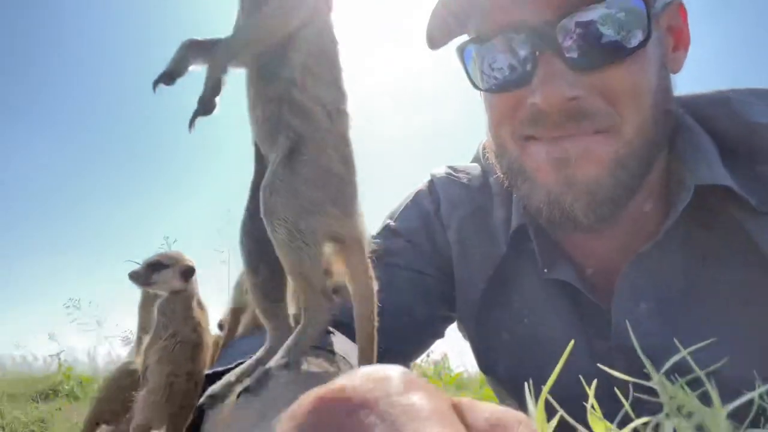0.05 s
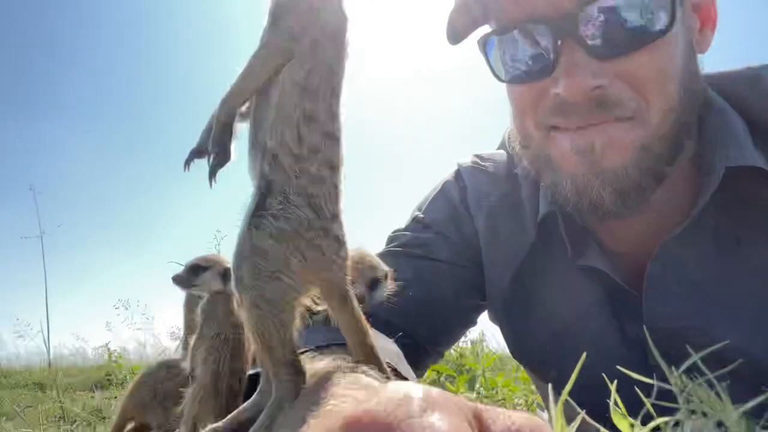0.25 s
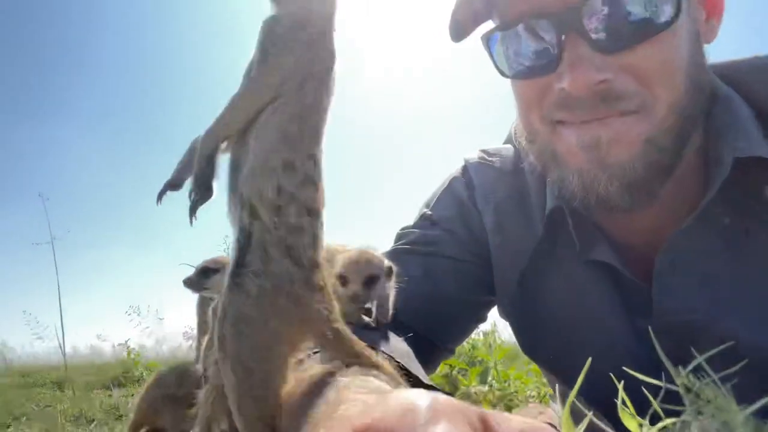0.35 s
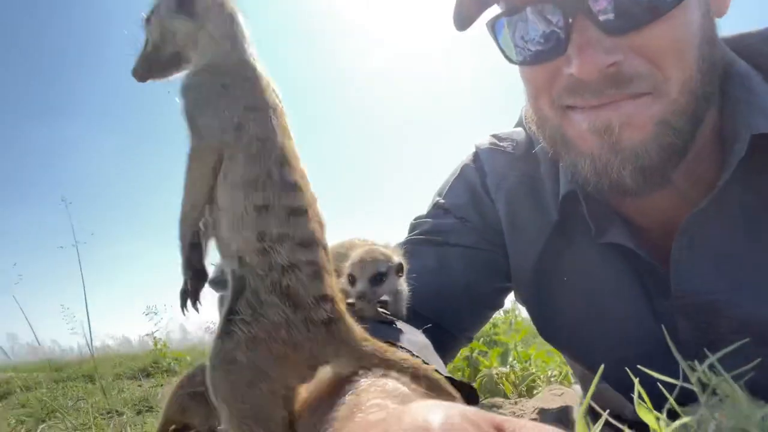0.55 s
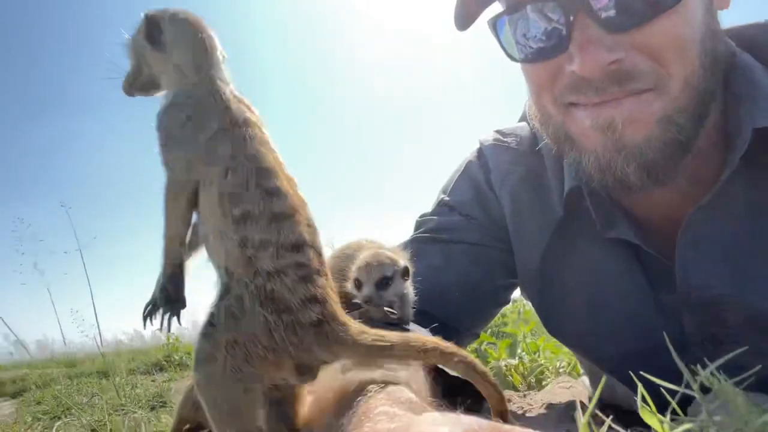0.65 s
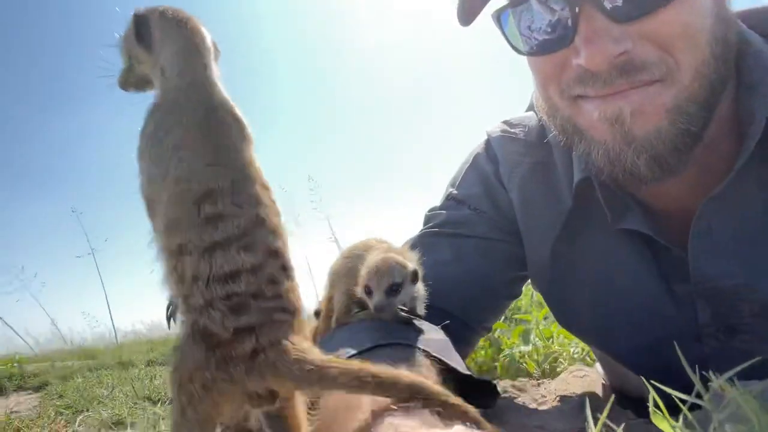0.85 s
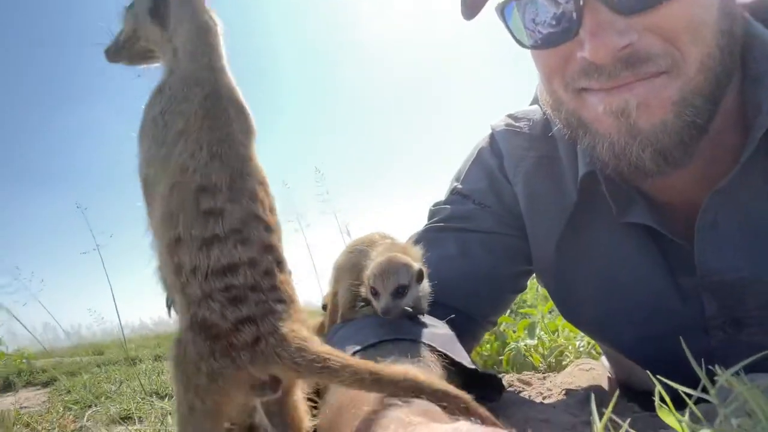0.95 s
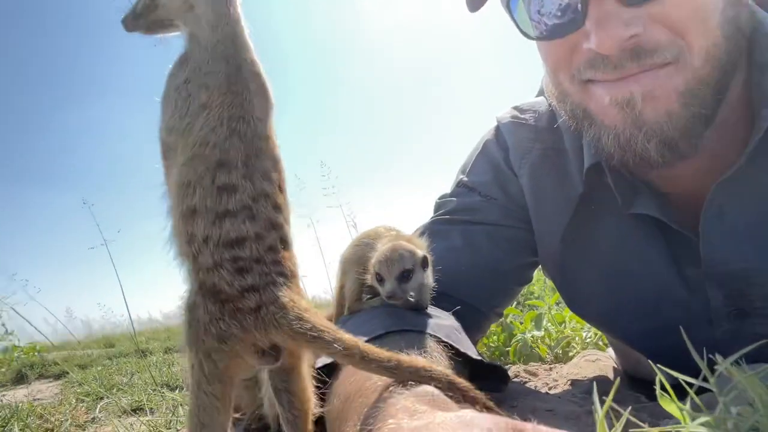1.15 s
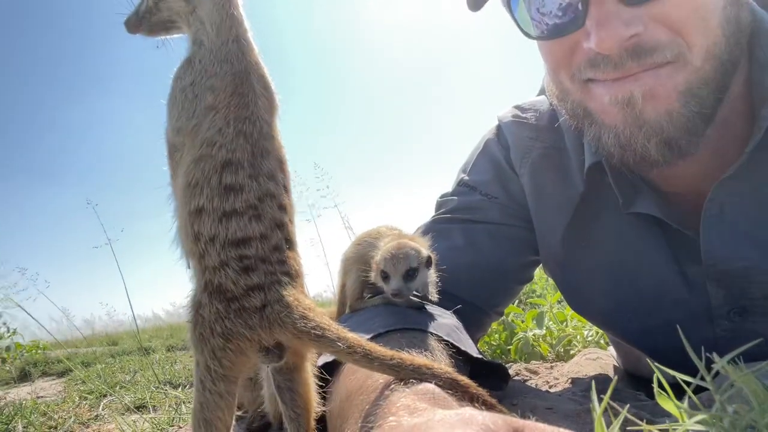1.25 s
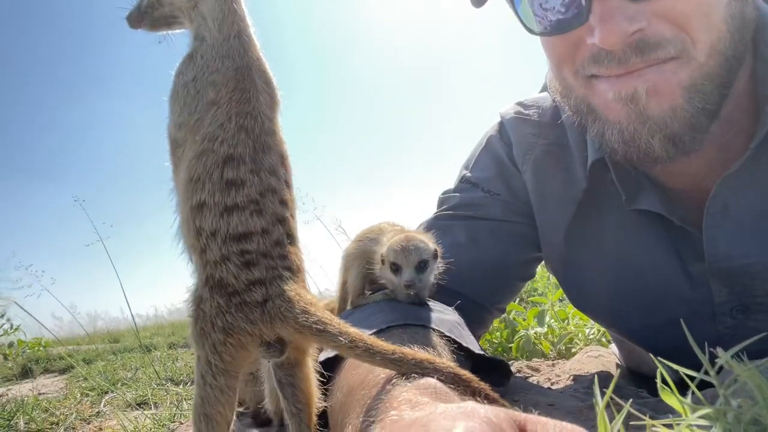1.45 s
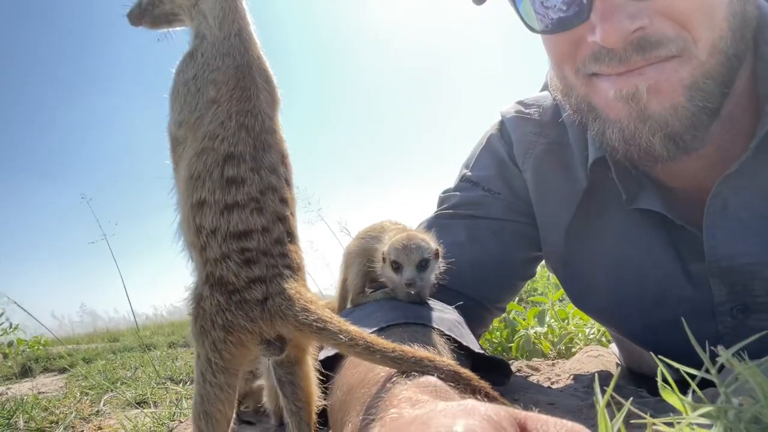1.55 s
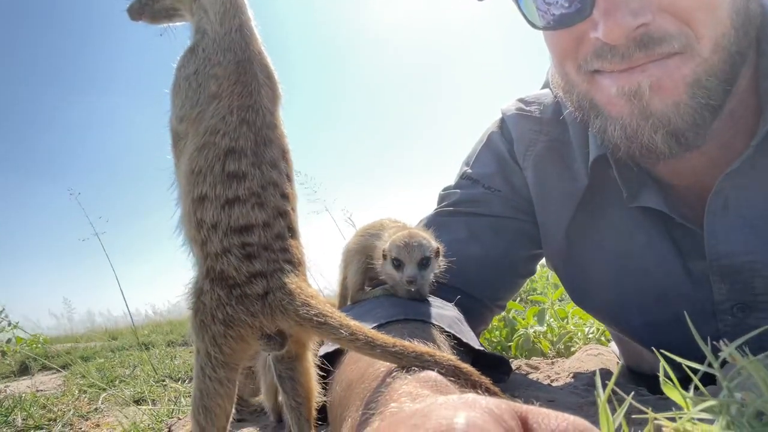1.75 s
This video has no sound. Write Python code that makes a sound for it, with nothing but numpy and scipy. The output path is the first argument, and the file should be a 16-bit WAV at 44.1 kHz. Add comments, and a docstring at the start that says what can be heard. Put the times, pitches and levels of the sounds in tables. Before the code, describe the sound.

A meerkat gives two harsh, raspy growls up close outdoors, with soft bumps between them.

```python
"""Meerkat growls and peeps in open grassland

Meerkats close to a hand-held phone. One gives two long raspy growls: jittered vocal pulses and breath,
throbbing, ring a small throat. Others peep briefly in gliding tones; nearby bodies and ground echo the voices.
Feet and hand bump the case (decaying low sines) and claws tick (short noise bursts). Fur and cloth rustle
and light wind rumbles, both as noise whose octave bands flicker separately.
"""
import sys
import numpy as np
from scipy import signal
from scipy.fft import rfft, irfft
from scipy.io import wavfile
from scipy.ndimage import uniform_filter1d

SR = 44100
rng = np.random.default_rng(int(sys.argv[2]) if len(sys.argv) > 2 else 0)


def persist_wave(psi):
    """Save psi, clipped to +-1, as 16-bit WAV."""
    counts = np.round(np.clip(psi, -1, 1) * 32767).astype(np.int16)
    wavfile.write(sys.argv[1], SR, np.atleast_2d(counts).T)


N = 79380
T = np.arange(N) / SR
F = np.fft.rfftfreq(N, 1 / SR)


def amp(db):
    """dB to gain."""
    return 10 ** (np.asarray(db) / 20)


def rms_one(x):
    """Scale to rms 1."""
    return x / np.sqrt(np.mean(x ** 2) + 1e-20)


def in_time(rows):
    """Interpolate table columns over time; the first column is seconds."""
    s, *columns = np.transpose(rows)
    return [np.interp(T, s, c) for c in columns]


def colour(x, points):
    """Shape the spectrum by (Hz, dB) points on a log frequency axis, then scale to rms 1."""
    hz, db = np.transpose(points)
    gain = amp(np.interp(np.log(F + 1), np.log(hz), db))
    return rms_one(irfft(rfft(x) * gain, N))


def drift(corner_hz):
    """Random wander of rms 1: white noise through two equal low-pass poles."""
    r = np.exp(-2 * np.pi * corner_hz / SR)
    white = rng.standard_normal(N + SR)
    return rms_one(signal.lfilter([1], [1, -2 * r, r * r], white)[SR:])


def resonance(x, hz, width_hz):
    """Two-pole peak of gain 1."""
    r = np.exp(-np.pi * width_hz / SR)
    poles = [1, -2 * r * np.cos(2 * np.pi * hz / SR), r * r]
    return signal.lfilter([(1 - r * r) / 2, 0, (r * r - 1) / 2], poles, x)


def patchy(points, flicker_db):
    """Coloured noise of rms 1 whose octave bands each flicker on their own."""
    white = rfft(rng.standard_normal(N))
    octave = np.round(np.log2(F + 1))
    bands = sum(irfft(white * (octave == k), N) * amp(flicker_db * drift(18.7)) for k in range(4, 15))
    return colour(bands, points)


# Phase lead of the left microphone common to all two_ports sources. Each row: frequency in Hz, lead in rad.
TREBLE_LEAD = [(7600, 0), (8600, 0), (10300, -3.14), (12100, -6.3), (13800, -9.4), (16000, -11)]


def two_ports(x, lead, balance_db=0):
    """One sound at two microphones: phase lead and level difference by frequency, split evenly."""
    phase_rad = np.interp(F, *np.transpose(lead + TREBLE_LEAD))
    half = np.exp(.5j * phase_rad) * amp(balance_db / 2)
    return irfft(rfft(x) * np.array([half, 1 / half]), N)


THROB_WANDER_CYCLES, THROB_LEAN_RAD = .03, -.8   # lean: swells slowly, drops fast
DEEP_GAPS_S = .126   # extra depth of second gaps fades out this long after gap_s
PULSE_SPREAD_DB, WEAK_PULSE_DB = 1.5, 3   # weak: typical drop of every second pulse at the top rate
WIDENING = 1.104   # on throat widths, since each resonance runs twice


def growl(rows, rates, throb, throat):
    """Jittered vocal pulses, each with a puff of breath over a steady leak, throb through the throat."""
    db, pulse_hz = in_time(rows)
    throb_hz, depth_db = in_time(rates)
    gap_s, second_db, jitter, breath, late_s = throb

    cycle = np.cumsum(pulse_hz * np.clip(1 + jitter * drift(250), .3, 3)) / SR
    count = np.floor(cycle - cycle[int(late_s * SR)])
    weak_db = WEAK_PULSE_DB * (count % 2) * pulse_hz / pulse_hz.max() * np.clip(1 + drift(20), 0, 2)
    pulse_gain = amp(PULSE_SPREAD_DB * rng.standard_normal(N) - weak_db) / np.sqrt(pulse_hz)
    pulses = np.diff(count, prepend=count[0]) * pulse_gain
    puff_shape = rms_one(signal.lfilter([1], [1, -.985], pulses))
    puffs = (puff_shape + .5) * rng.standard_normal(N)   # .5: steady leak
    source = rms_one(pulses) + breath * rms_one(puffs)

    turn = np.cumsum(throb_hz) / SR
    turn = turn - turn[int(gap_s * SR)] + THROB_WANDER_CYCLES * drift(56.0)
    leaning = np.pi * turn + THROB_LEAN_RAD * np.sin(np.pi * turn) ** 2
    gaps_db = depth_db * np.cos(leaning) ** 2 * np.clip(1 + drift(30) / 6, 0, 2)
    every_second = np.cos(np.pi * turn / 2) ** 16
    gaps_db = gaps_db + second_db * every_second * np.clip((gap_s + DEEP_GAPS_S - T) * 50, 0, 1)
    # the running mean keeps the throbs from lowering the overall level
    source = source * amp(-gaps_db) / np.sqrt(uniform_filter1d(amp(-2 * gaps_db), size=2400))

    voice = 0
    for k, (hz, width_hz, gain_db) in enumerate(throat):
        ring = resonance(resonance(source, hz, WIDENING * width_hz), hz, WIDENING * width_hz)
        voice = voice + (-1) ** k * amp(gain_db) * ring / np.sqrt(width_hz)
    on = (T > rows[0][0]) & (T < rows[-1][0])
    return voice / np.sqrt(np.mean(voice[on] ** 2)) * amp(db) * on


# One entry per growl in each of these six.
# Pulse course. Each row: time in seconds, level in dB, vocal pulses per second before jitter.
GROWLS = [
    [(.292, -63, 546), (.303, -59.5, 600), (.312, -49.5, 547), (.35, -46.5, 575), (.46, -48.5, 607),
     (.53, -47.5, 560), (.594, -56.5, 480), (.608, -76, 200)],
    [(1.03, -66, 200), (1.048, -50, 640), (1.066, -44.5, 572), (1.15, -45.5, 655), (1.4, -46, 645),
     (1.517, -45, 640), (1.532, -51, 260), (1.57, -53.5, 145), (1.6, -60, 75), (1.64, -94, 45)],
]
# Throb course. Each row: time in seconds, throbs per second, gap depth in dB before its random variation.
THROB_RATES = [
    [(.35, 58, 6), (.425, 72, 7), (.46, 52, 5)],
    [(1.06, 75.5, 4), (1.14, 75.5, 9), (1.3, 75.5, 9), (1.34, 69, 7.5), (1.42, 69, 7.5), (1.46, 80, 5),
     (1.54, 80, 0)],
]
# Throb and source. Each row: time of one gap in seconds, extra depth of every second gap in dB,
# pulse rate jitter as a share, breath to pulse rms ratio, time of a late vocal pulse in seconds.
THROB = [(.328, 19, .07, .2, .59), (1.148, 0, .07, .3, 1.606)]
# Throat resonances. Each row: centre in Hz, width in Hz before WIDENING, gain in dB before division by root width.
THROATS = [
    [(506, 850, -1), (932, 78, -1), (1300, 320, -4.5), (1468, 285, -1), (1891, 106, -6.5),
     (3826, 270, -8.5), (4340, 410, -18), (6100, 1200, -30), (11210, 520, -23)],
    [(432, 140, -5), (609, 165, -10.5), (871, 144, -0.5), (1386, 285, 1), (1916, 226, -6),
     (2795, 510, -13.5), (3437, 280, -6.5), (3894, 254, -4.5), (5970, 1550, -26.5), (8900, 900, -27.5),
     (10820, 520, -25)],
]
# Left microphone phase lead before TREBLE_LEAD. Each row: frequency in Hz, lead in rad.
LEADS = [
    [(1600, 0), (2100, 1.2), (2500, 2.7), (3400, 3.14), (4100, 4.1), (5000, 6.3), (6200, 7), (7500, 6.3)],
    [(1500, .1), (1900, 1), (3400, 2.4), (4400, 3.14), (5300, 3.14), (6200, 6), (7500, 6.3)],
]
# Left minus right level. Each row: frequency in Hz, difference in dB.
BALANCES = [
    [(500, 0.23), (1000, -0.74), (1900, -0.96), (3000, 0.32)],
    [(500, -2), (1000, 0), (1900, -0.5), (3000, 1)],
]


def growls():
    """Both growls, as a plain source and at the two microphones."""
    dry, stereo = np.zeros(N), np.zeros((2, N))
    for rows, rates, throb, throat, lead, balance in zip(GROWLS, THROB_RATES, THROB, THROATS, LEADS, BALANCES):
        voice = growl(rows, rates, throb, throat)
        dry += voice
        stereo += two_ports(voice, lead, np.interp(F, *np.transpose(balance)))
    return dry, stereo


PEEP_UPPER_DB = -20   # third and fourth harmonic
PEEP_WOBBLE, PEEP_HOARSE = .02, .3   # rms shares of pitch and level
PEEP_EDGE = .55   # envelope exponent; small = abrupt start and end
# Each row: start in seconds, length in seconds, first Hz and last Hz before wobble,
# fundamental level in dB before hoarseness, second harmonic in dB re fundamental.
PEEPS = [(-.05, 0.11, 670, 780, -57.5, -3), (-.02, 0.045, 1500, 1000, -56.5, -12),
         (0.1, 0.018, 766, 800, -69, 8), (0.1, 0.038, 1070, 760, -58.5, -3),
         (0.452, 0.023, 537, 486, -47.5, -1), (.46, 0.056, 560, 720, -56, 13),
         (0.646, 0.039, 807, 731, -65, -28), (1.062, 0.035, 558, 612, -58, 13.5),
         (1.12, 0.016, 507, 500, -52, 1.5), (1.444, 0.02, 492, 540, -53, 1.5)]


def peeps():
    """Short tones on a steepening glide; three overtones swell over the first half."""
    out = np.zeros(N)
    wobble = 1 + PEEP_WOBBLE * drift(94)
    for start_s, length_s, hz0, hz1, db, second_db in PEEPS:
        u = np.clip((T - start_s) / length_s, 0, 1)
        phase = 2 * np.pi * np.cumsum((hz0 + (hz1 - hz0) * u ** 2) * wobble) / SR
        upper = amp(PEEP_UPPER_DB) * (np.sin(3 * phase) + np.sin(4 * phase))
        overtones = amp(second_db) * np.sin(2 * phase) + upper
        tone = np.sin(phase) + np.minimum(2 * u, 1) * overtones
        tone = tone * (1 + PEEP_HOARSE * drift(400.0))
        envelope = (np.sin(np.pi * u) + 1e-9) ** PEEP_EDGE * (u > 0) * (u < 1)
        out += amp(db) * envelope * tone
    return out


# Nearby bodies and ground. Each row: left delay in seconds, right delay in seconds, level in dB.
ECHOES = [(.004, .0053, -16), (.023, .019, -24)]


def echoes(voices):
    """Delayed copies of the voices, timed separately for each microphone."""
    out = np.zeros((2, N))
    for left_s, right_s, db in ECHOES:
        out[0] += amp(db) * np.roll(voices[0], int(left_s * SR))
        out[1] += amp(db) * np.roll(voices[1], int(right_s * SR))
    return out


SPREAD_S, SPREAD_DB, SPREAD_HZ = .00458, -4.5, 1095   # Hz: low-pass corner


def stereo_spread(dry):
    """Dull, slightly late copy of the voices, opposite in sign at the microphones: the phone's stereo widening."""
    low_pass = signal.butter(4, SPREAD_HZ, fs=SR, output="sos")
    dull = signal.sosfilt(low_pass, np.roll(dry, int(SPREAD_S * SR)))
    return amp(SPREAD_DB) * dull * [[1], [-1]]


BUMP_RISE_CYCLES, BUMP_TOP_HZ = .25, 380   # rise time constant; low-pass corner
BUMP_PAN_DB, BUMP_SKEW_RAD = -.5, .42   # left minus right; phase offset of each side, opposite signs
# Each row: start in seconds, level in dB before rise, decay, low-pass and pan, pitch in Hz, ring t60 in seconds.
BUMPS = [(0.185, -46, 64, 0.18), (0.208, -28, 98.6, 0.052), (0.23, -39.5, 55.8, 0.28),
         (0.251, -39.5, 136, 0.057), (0.33, -44.5, 52.3, 0.2), (0.575, -47, 116.7, 0.36),
         (0.613, -30, 111.7, 0.088), (.64, -34.5, 63.2, 0.16), (.665, -39.5, 154, 0.096),
         (.687, -35.5, 228.5, 0.048), (0.696, -29.5, 75, 0.096), (0.711, -35, 203, 0.032),
         (.724, -23.5, 76, 0.062), (.765, -28.5, 195, 0.072), (0.773, -26, 76, 0.053),
         (.776, -23.5, 146.8, 0.07), (0.788, -28, 214.6, 0.055), (0.796, -30.5, 264, 0.03),
         (0.804, -29, 54, 0.15), (0.871, -43, 62.2, 0.23), (1.522, -48, 55, 0.15)]


def bumps():
    """Soft pushes set the case swinging; each reaches the two microphones in different phase."""
    out = np.zeros((2, N))
    skews = BUMP_SKEW_RAD * rng.choice([-1, 1], (len(BUMPS), 1)) * [1, -1]
    for (start_s, db, hz, t60_s), skew in zip(BUMPS, skews):
        t = np.maximum(T - start_s, 0)
        rise = (1 - np.exp(-t * hz / BUMP_RISE_CYCLES)) ** 2
        out += amp(db - 60 * t / t60_s) * rise * np.sin(2 * np.pi * hz * t + skew[:, None])
    out = signal.sosfilt(signal.butter(2, BUMP_TOP_HZ, fs=SR, output="sos"), out)
    return out * amp(np.array([[.5], [-.5]]) * BUMP_PAN_DB)


TICK_RISE_S, TICK_FALL_S, TICK_TRIM_DB = .0006, .003, -2.5   # time constants; gain on all ticks
# Claw ticks. Each row: peak time in seconds, peak level in dB before TICK_TRIM_DB.
TICKS = [(0.7669, -58.5), (0.846, -55.5), (0.857, -56.5), (0.867, -53.5), (0.878, -60.5), (0.9576, -64)]
# Tick spectrum. Each row: frequency in Hz, relative level in dB.
TICK_COLOUR = [(700, -36), (2000, -14), (4000, -12), (9000, -8.5), (16000, -4)]


def ticks():
    """Claws: short bright noise bursts with exponential rise and fall."""
    shape = np.zeros(N)
    for peak_s, db in TICKS:
        shape += amp(db) * np.exp(-np.abs(T - peak_s) / np.where(T < peak_s, TICK_RISE_S, TICK_FALL_S))
    return shape * colour(rng.standard_normal(N), TICK_COLOUR) * amp(TICK_TRIM_DB)


RUSTLE_FLICKER_DB, RUSTLE_LOOSE_DB = 2.5, -10   # loose: part opposite at the microphones, re common part
# Level of the common part. Each row: time in seconds, level in dB.
RUSTLE = [(0, -67.5), (.2, -65.5), (.33, -64), (.45, -68), (.58, -85), (1.03, -79), (1.1, -118),
          (1.55, -84), (1.8, -90)]
# Rustle spectrum. Each row: frequency in Hz, relative level in dB per Hz.
RUSTLE_COLOUR = [(1500, -13), (3000, -12), (5000, -6), (8000, 0.5), (12000, 4.5), (16000, 2.5)]
# Extra colour of the loose part. Each row: frequency in Hz, relative level in dB.
RUSTLE_LOOSE = [(3000, 10.5), (7000, -2)]
# Left phase lead before TREBLE_LEAD, for ticks too. Each row: frequency in Hz, lead in rad.
RUSTLE_LEAD = [(4600, 0), (5500, 3), (6900, 2.7), (7500, 0)]


def rustle():
    """Fur and cloth: flickering bright noise, partly opposite in sign at the two microphones."""
    loose = colour(patchy(RUSTLE_COLOUR, RUSTLE_FLICKER_DB), RUSTLE_LOOSE)
    loose = amp(RUSTLE_LOOSE_DB) * loose * [[1], [-1]]
    common = two_ports(patchy(RUSTLE_COLOUR, RUSTLE_FLICKER_DB), RUSTLE_LEAD)
    return amp(in_time(RUSTLE)[0]) * (common + loose)


WIND_FLICKER_DB, WIND_SIDE_DB = 2.5, .5   # side: part opposite at the microphones, re common part
# Wind spectrum. Each row: frequency in Hz, relative level in dB per Hz.
WIND = [(15, -25), (30, -13.5), (250, -9), (400, -11.5), (870, -25.5), (2200, -43), (6000, -48),
        (13000, -62)]
# Level of the common part. Each row: time in seconds, level in dB.
WIND_LEVEL = [(0, -68), (1.0, -64), (1.8, -64)]


def wind():
    """Light wind: flickering low noise, a common part plus one of opposite sign at the microphones."""
    common = patchy(WIND, WIND_FLICKER_DB)
    side = amp(WIND_SIDE_DB) * patchy(WIND, WIND_FLICKER_DB) * [[1], [-1]]
    return amp(in_time(WIND_LEVEL)[0]) * (common + side)


def scene():
    """Sum of all sources at the two microphones."""
    growl_dry, growl_stereo = growls()
    peep_dry = peeps()
    voices = growl_stereo + two_ports(peep_dry, [])
    voice_copies = echoes(voices) + stereo_spread(growl_dry + peep_dry)
    handling = bumps() + two_ports(ticks(), RUSTLE_LEAD)
    return voices + voice_copies + handling + rustle() + wind()


CUTOFF_HZ = 15800


def record(dry):
    """Steep elliptic low-pass cuts the top."""
    return signal.sosfilt(signal.ellip(10, .5, 70, CUTOFF_HZ, fs=SR, output="sos"), dry)


dry = scene()
out = record(dry)
persist_wave(out)
```